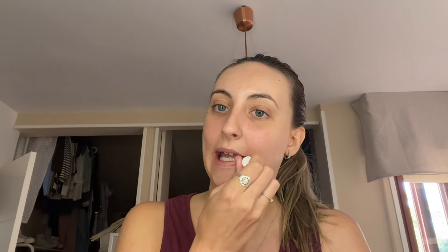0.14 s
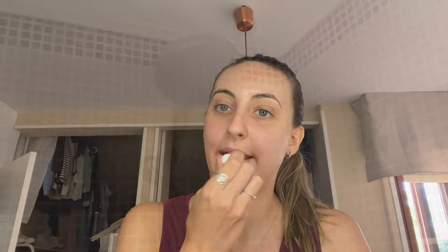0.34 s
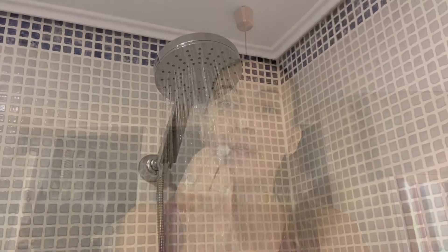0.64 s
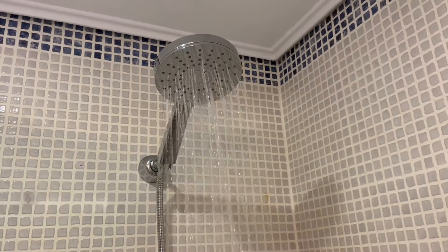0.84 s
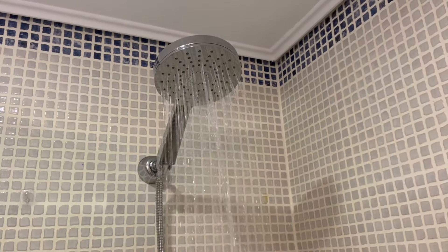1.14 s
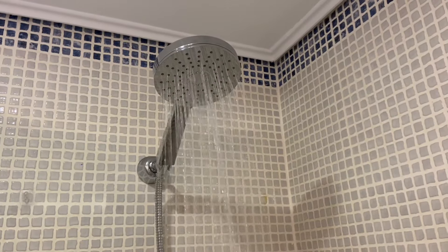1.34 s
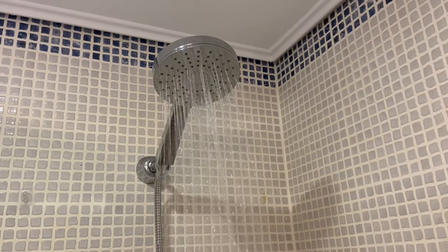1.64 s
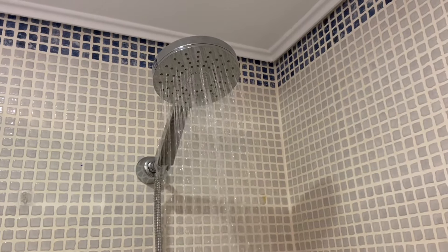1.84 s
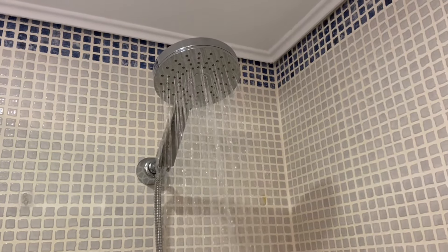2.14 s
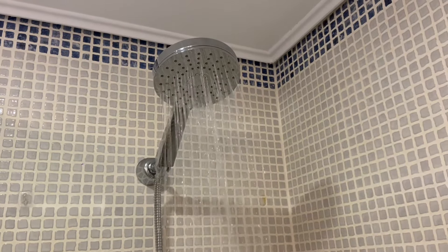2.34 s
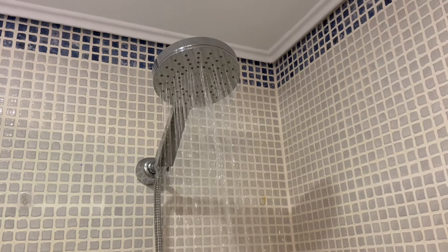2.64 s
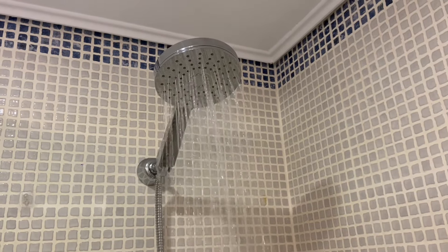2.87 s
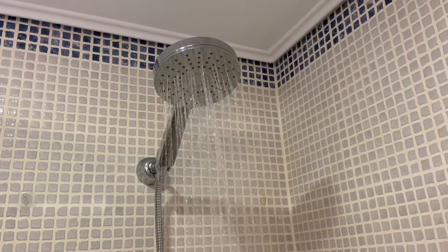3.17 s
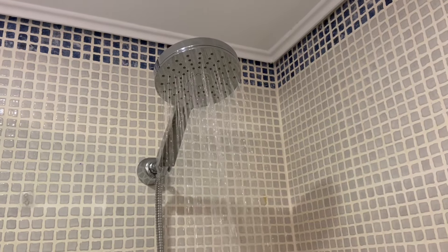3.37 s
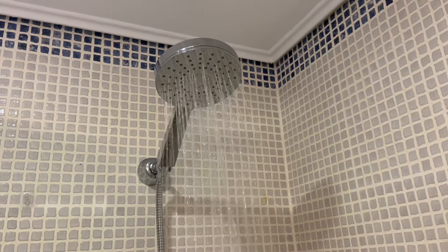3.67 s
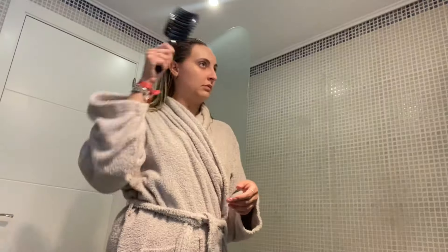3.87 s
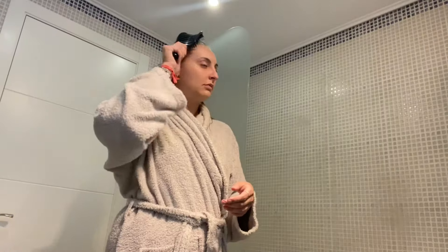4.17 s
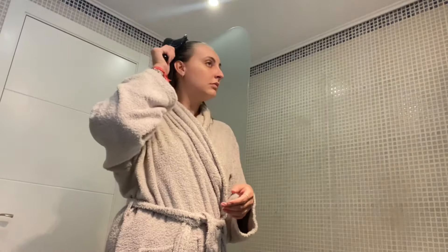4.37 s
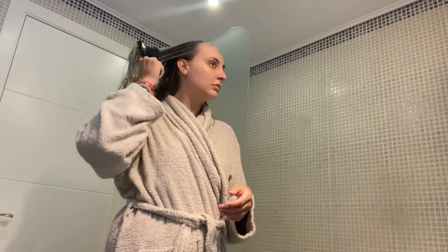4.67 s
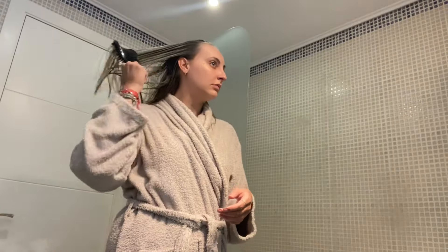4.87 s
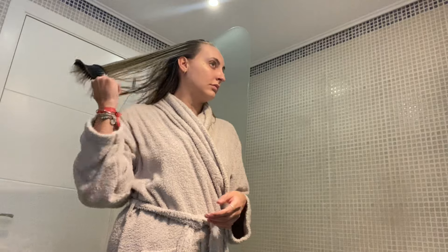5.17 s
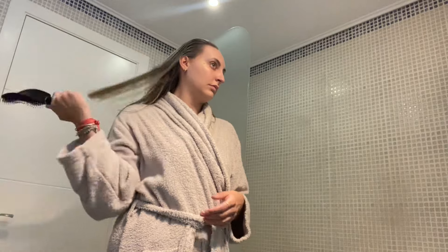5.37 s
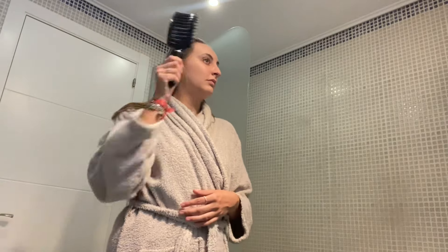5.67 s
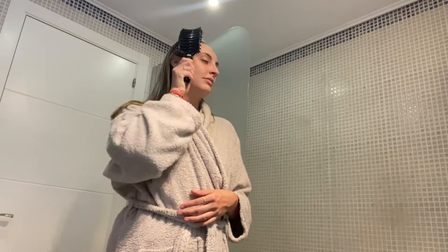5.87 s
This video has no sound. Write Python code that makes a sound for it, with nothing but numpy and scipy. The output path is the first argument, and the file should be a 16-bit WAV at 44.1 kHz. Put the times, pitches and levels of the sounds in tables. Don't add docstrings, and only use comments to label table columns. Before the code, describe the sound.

After a near-silent room, a bright shower spray fades in, splatters steadily, then cuts abruptly to a quiet bathroom with hair brushing and bracelet jingles.

```python
import sys
import numpy as np
from scipy import signal
from scipy.fft import rfft, irfft
from scipy.io import wavfile
from scipy.ndimage import uniform_filter1d

SR = 44100
rng = np.random.default_rng(int(sys.argv[2]) if len(sys.argv) > 2 else 0)


def wrap_up_sound(samples):
    columns = np.atleast_2d(samples).T
    tamed = np.clip(columns, -1, 1)
    steps = np.round(tamed * 32767).astype(np.int16)
    wavfile.write(sys.argv[1], SR, steps)


def nominal_scale(level):
    x = np.asarray(level, float) / 20
    return 10 ** x


N = 265039
TIME, HZ = np.arange(N) / SR, np.fft.rfftfreq(N, 1 / SR)
CUT_S = 3.741
FADE_START_S, FADE_S = 0.3, 0.51


def evened(x):
    return x / np.sqrt(np.mean(x ** 2) + 1e-20)


def read_spectrum(points, hz):
    f, db = np.transpose(points)
    return np.interp(np.log(hz + 1), np.log(f + 1), db)


def envelope(rows, offset_db):
    s, db = np.transpose(rows)
    return nominal_scale(np.interp(TIME, s, db, -150, -150) + offset_db)


def coloured(x, db):
    return evened(irfft(rfft(x) * nominal_scale(db), N))


def add(mix, s, sound):
    part = mix[..., round(s * SR):][..., :sound.shape[-1]]
    part += sound[..., :part.shape[-1]]


def ports(pair, table):
    f, likeness, phase = np.transpose(table)
    likeness = np.clip(np.interp(HZ, f, likeness), 0, 1)
    first, second = rfft(pair)
    shared = likeness * first * np.exp(1j * np.interp(HZ, f, phase))
    right = shared + np.sqrt(1 - likeness ** 2) * second
    return np.array([pair[0], irfft(right, N)])


def restless(patch_db, flicker_db, swell_db):
    hz, t, z = signal.stft(rng.standard_normal((2, N)), SR, nperseg=256, noverlap=192)

    def field(bands, frames):
        smooth = uniform_filter1d(rng.standard_normal((len(hz), len(t))), size=bands, axis=0)
        return evened(uniform_filter1d(smooth, size=frames, axis=1))

    z *= nominal_scale(patch_db * field(5, 24) + flicker_db * field(40, 6) + swell_db * field(90, 70))
    return signal.istft(z, SR, nperseg=256, noverlap=192)[1][:, :N]


def rooms():
    # f/Hz, level per Hz/dB
    bedroom = [(25, -17), (50, 3), (100, -8.5), (200, -15.5), (400, -19.5), (800, -23), (1600, -28),
               (3200, -33), (6400, -35.5), (10000, -34), (13000, -42), (15500, -50)]
    bathroom = [(25, -27.5), (50, 2.5), (100, -0.5), (200, -11), (400, -14), (800, -16), (1600, -21.5),
                (3200, -26), (6400, -31), (10000, -25.5), (13000, -33.5), (15500, -30)]
    bedroom_db, bathroom_db = -59.5, -59.5
    air = restless(.6, .3, 0.78)
    leaving = np.clip((.75 - TIME) / .45, 0, 1)
    before = nominal_scale(bedroom_db) * coloured(air, read_spectrum(bedroom, HZ)) * leaving
    hum = 1 + 0.84 / (1 + (2 * (HZ - 104) / 14) ** 2)
    bathroom_air = coloured(air, read_spectrum(bathroom, HZ) + 20 * np.log10(hum))
    return before + nominal_scale(bathroom_db) * bathroom_air * (TIME > CUT_S)


def fade(length, bend):
    return np.clip((TIME - FADE_START_S) / length, 0, 1) ** bend


def droplets(per_s, spread_db):
    out = np.zeros((2, N))
    for hz in np.geomspace(2500, 14500, 16):
        turns = np.arange(round(5 * SR / hz)) * hz / SR
        blip = np.sin(2 * np.pi * turns * (.8 + 0.062 * turns)) * np.hanning(len(turns))
        hits = rng.random((2, N)) < per_s / 16 / SR
        train = hits * nominal_scale(spread_db * np.minimum(rng.exponential(1, (2, N)), 4))
        out += signal.oaconvolve(train, blip[None] * np.sqrt(hz), axes=1)[:, :N]
    return evened(out)


def lumps(count):
    # t/s, level/dB, f/Hz, length/s
    high_splats = [(0.731, -17.5, 5700, .009), (0.838, -16.5, 9100, .019), (0.862, -17, 9500, .0067),
                   (0.979, -14.5, 7900, 0.02), (0.999, -14, 8300, 0.0028), (1.146, -13.5, 8800, .033),
                   (1.248, -9.5, 9700, .0078), (1.337, -19, 10400, .022), (1.359, -15, 9900, .0065),
                   (1.463, -12, 7200, 0.0091), (1.477, -11.5, 10200, .005), (1.597, -11.5, 8100, .015),
                   (1.779, -10, 8200, 0.011), (1.834, -14, 7400, .012), (1.893, -20.5, 10400, .0078),
                   (1.928, -13, 7200, 0.0058), (2.039, -17, 8200, 0.012), (2.182, -10.5, 7900, 0.017),
                   (2.228, -20.5, 10800, 0.025), (2.512, -12, 9800, .0084), (2.531, -11.5, 11900, .018),
                   (2.624, -12, 8200, 0.022), (2.766, -15, 8600, .027), (2.919, -15.5, 10900, 0.031),
                   (2.967, -11.5, 9000, 0.0092), (3.08, -12.5, 9300, 0.01), (3.187, -13, 6600, .01),
                   (3.224, -14, 9800, .016), (3.402, -13, 11300, 0.024), (3.72, -10.5, 9700, 0.0074)]
    # t/s, level/dB, f/Hz, length/s
    low_splats = [(0.733, -19, 4530, .008), (1.769, -14.5, 5390, .008), (2.512, -29.5, 1600, .02),
                  (2.512, -21, 4800, .008), (2.605, -19.5, 3200, .008), (2.616, -15, 4800, .01),
                  (2.624, -6, 6590, .003), (2.631, -20.5, 4200, .008), (2.878, -17, 4720, .008),
                  (3.188, -23, 4590, .008), (3.265, -16, 5500, .011)]
    width_hz, low_spread = 3100, .15
    small_db, small_hz, small_s = -19, 10200, .01
    chance = [(FADE_START_S + FADE_S + 2.5 * when, small_db + 5 * (size - .5),
               small_hz * (0.67 + .4 * tone), small_s) for when, size, tone in rng.random((count, 3))]
    high = [(s, db, hz, width_hz / hz, length) for s, db, hz, length in high_splats + chance]
    low = [(s, db, hz, low_spread, length) for s, db, hz, length in low_splats]
    return high + low


def splat(db, hz, spread, length):
    t = np.arange(-1024, 3072) / SR
    f, frames, z = signal.stft(rng.standard_normal((2, len(t))), SR, nperseg=128)
    centre = hz * np.exp(3.6 * (frames + t[0]))
    z *= np.exp(-(np.log((f[:, None] + 1) / centre) / (1.77 * max(spread, .05))) ** 2)
    puff = evened(signal.istft(z, SR, nperseg=128)[1][:, :len(t)])
    burst = np.exp(-(t / (0.61 * max(length, .003))) ** 2)
    ringing = 0.28 * np.exp(-abs(t) / 0.075) * (t > 0)
    return nominal_scale(db - 2.5) * puff * (burst + ringing)


def shower():
    # f/Hz, level per Hz/dB
    spray_shape = [(25, -22.5), (45, -7.5), (70, 0), (140, -15.5), (200, -6.5), (350, -4.5), (700, -7),
                   (1000, -5.5), (1500, -11.5), (2200, -13.5), (3500, -13), (5000, -8), (8000, -5.5),
                   (15000, -3.5)]
    # f/Hz, width/Hz, lift/dB
    stall = [(78, 14, 3), (104.7, 8, 18), (194, 11, 7.5), (256.6, 22, 7), (295, 66, 7), (354, 14, 4.5),
             (475, 12, 11), (566, 36, 8), (699, 30, 8.5), (947, 60, 5)]
    # f/Hz, left minus right/dB
    tilt_stall = [(60, -2.5), (250, -.5), (700, 1), (1500, 0.7), (5000, 2.9), (8000, 0.7)]
    # f/Hz, left-right likeness, phase of right/rad
    ports_stall = [(100, .97, 0), (250, .92, 0), (450, .72, -.1), (700, .3, -.6), (1700, .15, 1.8),
                   (2800, .35, -.3), (4800, .38, -.2), (5800, .2, .8), (6900, .82, 0), (9050, .945, 3.14),
                   (15250, .96, 12.6)]
    spray_db, drumming_db, hum_db = -15, -29, -33
    shape_db = read_spectrum(spray_shape, HZ)
    shape_db -= 10 * np.log10(1 + (32 / (HZ + 1)) ** 8)
    low, lowest = 1 / (1 + (HZ / 1400) ** 6), 1 / (1 + (HZ / 145) ** 8)
    lift = 1 + sum((nominal_scale(db) - 1) / (1 + (2 * (HZ - f) / width) ** 2) for f, width, db in stall)

    patter = restless(1.1, 0.98, .6)
    hum = coloured(patter, shape_db + 10 * np.log10(lowest * lift ** 2 + 1e-12))
    drumming = coloured(patter, shape_db + 10 * np.log10((low - lowest) * lift ** 2 + 1e-12))
    fizz = evened(restless(1.4, 1.0, 0.4)) + 0.34 * droplets(3000, 3.6)
    spray = coloured(fizz, shape_db + 10 * np.log10(1 - low + 1e-9))

    water = (spray * nominal_scale(spray_db) + drumming * nominal_scale(drumming_db)) * fade(FADE_S, 1)
    water += hum * nominal_scale(hum_db) * fade(0.94, 1.27)
    for s, *blow in lumps(count=18):
        add(water, s - 1024 / SR, splat(*blow))
    heard = ports(water * (TIME < CUT_S + .1), ports_stall)
    tilt = nominal_scale(read_spectrum(tilt_stall, HZ) * np.array([[.5], [-.5]]))
    return irfft(rfft(heard) * tilt, N)


def robe(rub):
    # t/s, level/dB, length/s
    rustles = [
        (3.744, -58, .03),
        (4.534, -62, 0.086),
        (4.93, -67, 0.043),
        (5.332, -61.5, 0.1),
        (5.58, -65, 0.093),
        (6.0, -63, 0.12),
    ]
    puffs = sum(nominal_scale(db - 2.5) * np.exp(-((TIME - s) / length) ** 2) for s, db, length in rustles)
    return coloured(rub, -14 * np.log2((HZ + 1) / 310) ** 2) * puffs * (TIME > CUT_S)


def sleeve(rub):
    # t/s, level/dB
    swish = [
        (3.75, -66),
        (3.775, -63),
        (3.81, -64),
        (3.825, -72),
        (3.835, -85),
    ]
    return coloured(rub, -22 * np.log2((HZ + 1) / 2900) ** 2) * envelope(swish, -4.5)


def hair(rub):
    # f/Hz, level per Hz/dB
    bristles = [(1500, -10), (2500, -9), (4000, -5), (6000, -2), (8000, 2), (10500, 3.5), (13000, -0.4),
                (15500, -7.5)]
    # t/s, level/dB
    stroke = [
        (4.12, -81),
        (4.33, -74.5),
        (4.534, -62.5),
        (4.592, -68),
        (4.734, -63.5),
        (5.308, -65.5),
        (5.33, -74),
        (5.7, -83),
        (6.0, -88),
    ]
    return coloured(rub, read_spectrum(bristles, HZ) - 30 * (HZ < 900)) * envelope(stroke, 9.9)


def brush():
    rub = restless(1.0, .9, 0.76)
    return hair(rub) + sleeve(rub) + robe(rub)


def links(modes, t):
    ring = np.zeros(len(t))
    for hz, scatter, db, t60 in modes:
        strength, detune = rng.standard_normal(2)
        decay = nominal_scale(db + 2.4 * strength - 60 * t / t60)
        ring += decay * np.sin(2 * np.pi * hz * (1 + scatter * detune) * t)
    return ring


def bracelet():
    # t/s, first knock level/dB, large links relative level/dB, rattle t60/s
    jingles = [(3.8043, -46, -32, 0.15), (3.8826, -39, -20.5, 0.35), (3.957, -42.5, -20, .04),
               (4.0314, -45, -10, .04), (4.0434, -35, -16, 0.18), (4.0854, -56, -11, .3),
               (5.3577, -48, -13, .15), (5.3894, -47, -14, .15), (5.4864, -52, -22, .04),
               (5.5243, -48, -30, .2), (5.539, -44, -34, .3), (5.5613, -44, -31, .3),
               (5.616, -52, -15, .04), (5.6466, -45, -27, .04), (5.657, -42, -29, .1),
               (5.7443, -47, -16, .04), (5.761, -48, -11, 0.14), (5.8356, -59, -12, .04),
               (5.852, -53, -18, 0.54), (5.9018, -55, -22, .15)]
    # f/Hz, scatter as a share, level/dB, t60/s
    small_links = [(13940, .012, 0, .03), (14250, .015, -2, .02), (13400, .03, -4, .015),
                   (12700, .03, -7, .015), (11800, .04, -10, .015), (14800, .02, -9, .012)]
    large_links = [(9010, .004, -2, .06), (8250, .02, -5, .025), (7800, .03, -9, .02)]
    gap_s, rattle_db = 0.011, -4
    t, direct = np.arange(3500) / SR, np.zeros(N)
    for s, db, large_db, t60 in jingles:
        later = np.cumsum(gap_s * rng.uniform(.6, 1.4, size=4))
        rattle = [(wait, db + rattle_db - 60 * wait / max(t60, .01)) for wait in later]
        for wait, knock_db in [(0, db)] + rattle:
            ring = links(small_links, t) + nominal_scale(large_db + 10.0) * links(large_links, t)
            ring[:5] += np.array([-0.5, -6, 5.5, 1, -2.5])
            add(direct, s + wait, nominal_scale(knock_db - 6.5) * ring)
    tail = rng.standard_normal((2, 9000)) * nominal_scale(-60 * np.arange(9000) / SR / .13)
    wet = signal.fftconvolve(direct[None], tail / np.linalg.norm(tail[0]), axes=1)[:, :N]
    return 0.85 * direct + nominal_scale(2.5) * wet


def thinned(pair, weak_db):
    window = np.sqrt(signal.windows.hann(2048, sym=False))
    both = np.pad([pair[0] + pair[1], pair[0] - pair[1]], [(0, 0), (440, 0)])
    hz, t, z = signal.stft(both, SR, window, nperseg=2048)
    bins = abs(z[:, :1024]) ** 2
    power = bins.reshape(2, 64, 16, -1).mean(axis=2)
    band_hz = hz[:1024:16, None]
    wavering_db = weak_db + 1.1 * rng.standard_normal(power.shape)
    kept = (power > power[::-1] * nominal_scale(-2 * wavering_db)) | (band_hz < 6000)
    near = uniform_filter1d(power.mean(axis=0), size=5, axis=0)
    middle = abs(band_hz - 4300) < 2000
    kept &= ~(middle & (power < near * nominal_scale(-2 * 3.7)))
    fine = bins.reshape(2, 256, 4, -1).mean(axis=2)
    faint = fine < .3 * uniform_filter1d(fine, 9, axis=1)
    starved = (abs(hz[:1024:4, None] - 3300) < 900) & faint
    z[:, :1024] *= np.repeat(kept, 16, axis=1) * np.repeat(~starved, 4, axis=1)
    total, difference = signal.istft(z, SR, window, nperseg=2048)[1][:, 440:N + 440]
    return np.array([total + difference, total - difference]) / 2


def scene():
    # f/Hz, left-right likeness, phase of right/rad
    ports_room = [(60, .7, 0), (200, .4, -.3), (700, .4, -2.7), (1700, .12, -1.5), (5500, .2, 3),
                  (6900, .5, 1), (7950, .92, 0), (15200, .94, -9.42)]
    cut = np.exp(-np.maximum(TIME - CUT_S, 0) / .0015)
    quiet = ports(rooms() + brush() + bracelet(), ports_room) * nominal_scale([[-.4], [.4]])
    return thinned(shower(), 6.) * cut + thinned(quiet, 7.5)


def top_cut(x):
    return signal.sosfilt(signal.butter(12, 16860, fs=SR, output="sos"), x)


def record(dry):
    taps = signal.firwin(601, 15830, window=("kaiser", 9), fs=SR)
    limited = signal.oaconvolve(dry, taps[None], "same")
    return top_cut(np.clip(limited, -1, 1))


dry = scene()
out = record(dry)
wrap_up_sound(out)
```